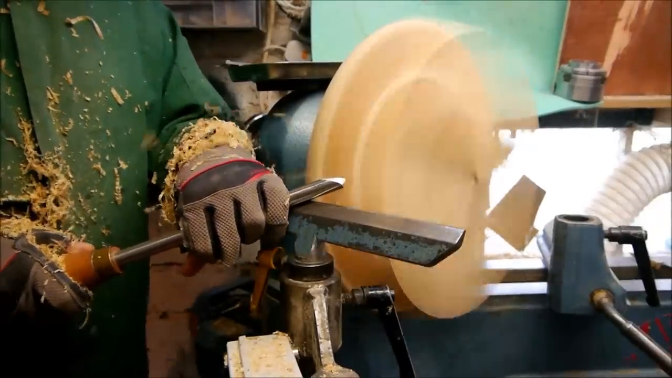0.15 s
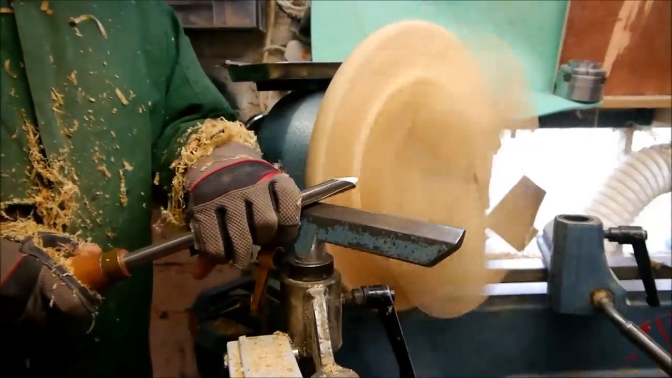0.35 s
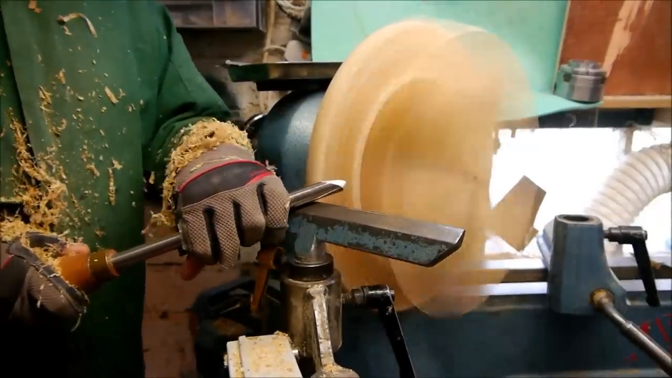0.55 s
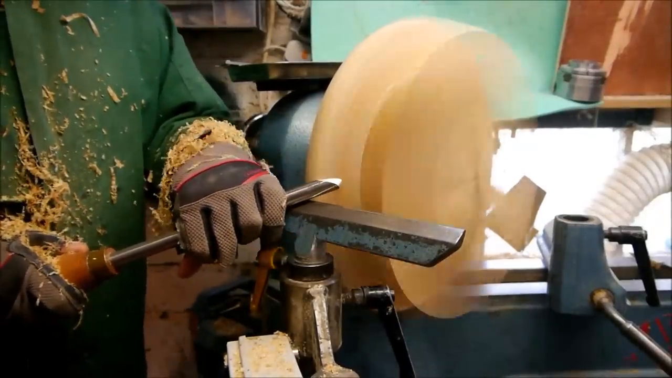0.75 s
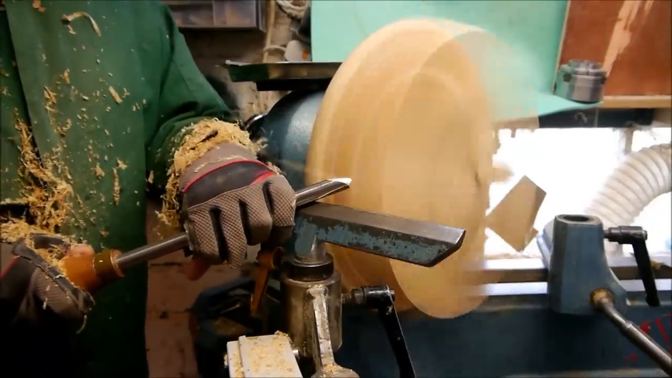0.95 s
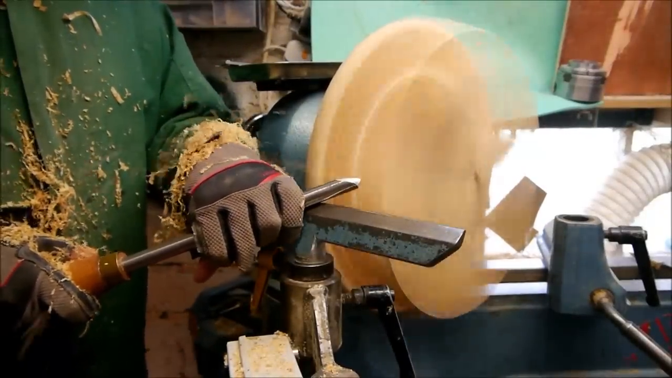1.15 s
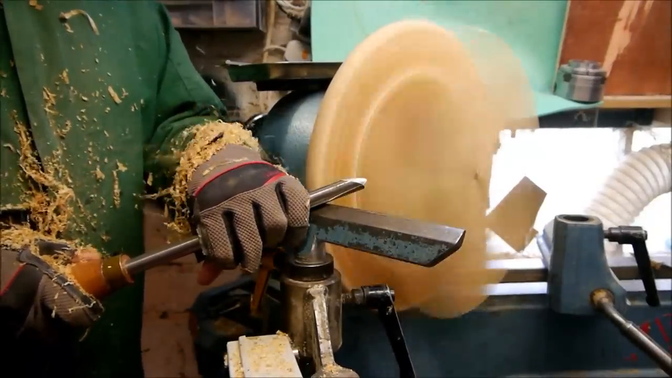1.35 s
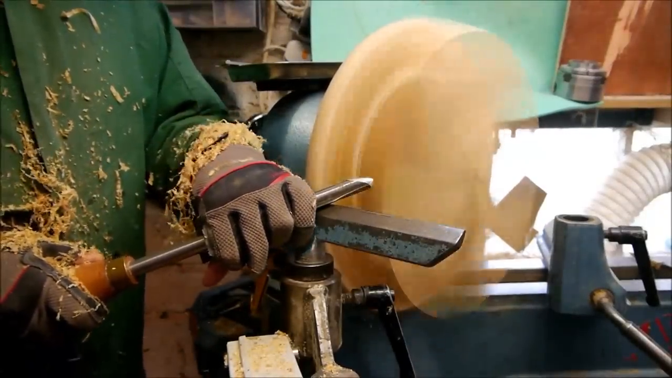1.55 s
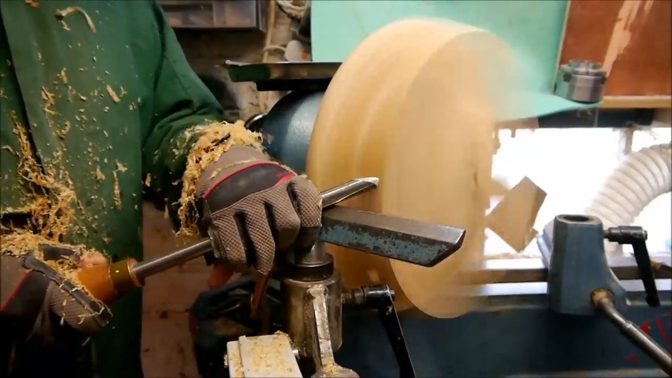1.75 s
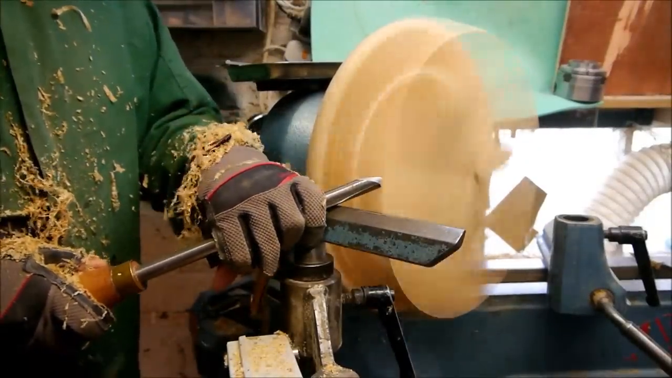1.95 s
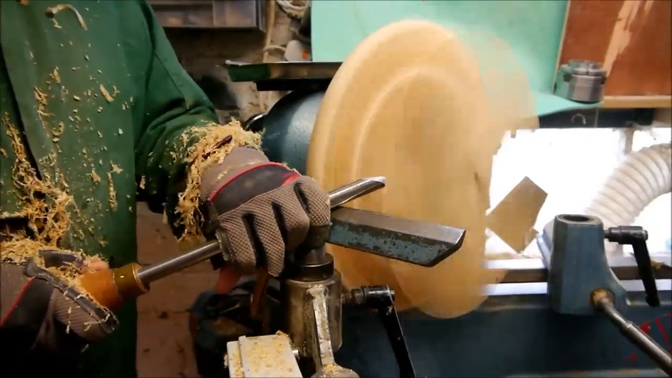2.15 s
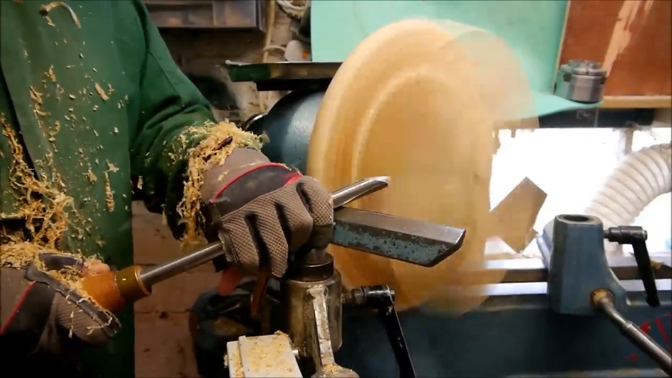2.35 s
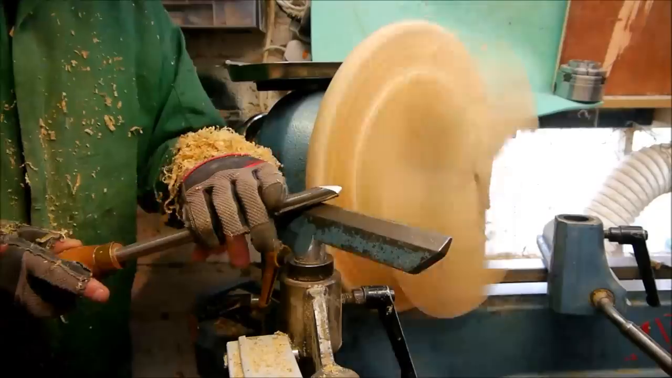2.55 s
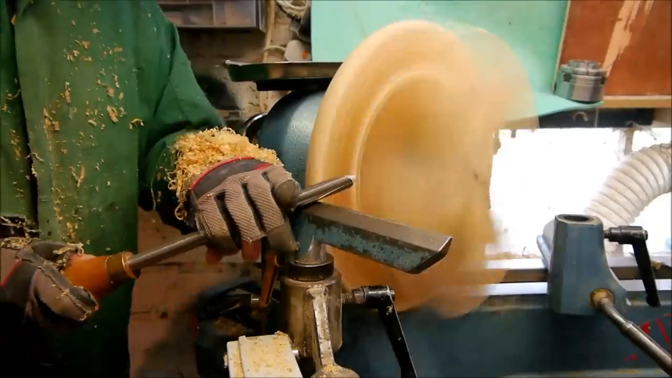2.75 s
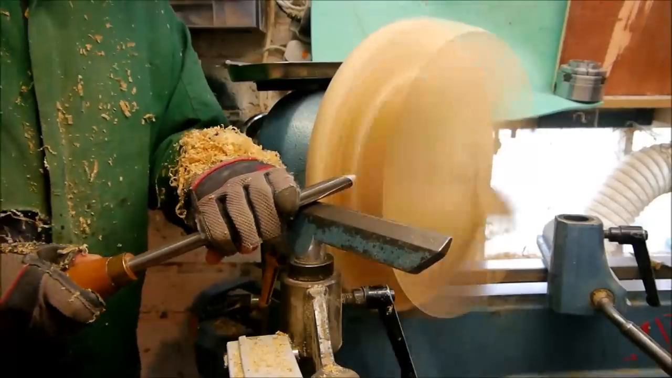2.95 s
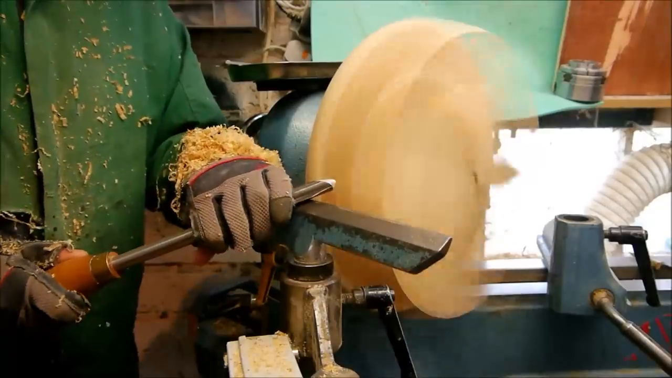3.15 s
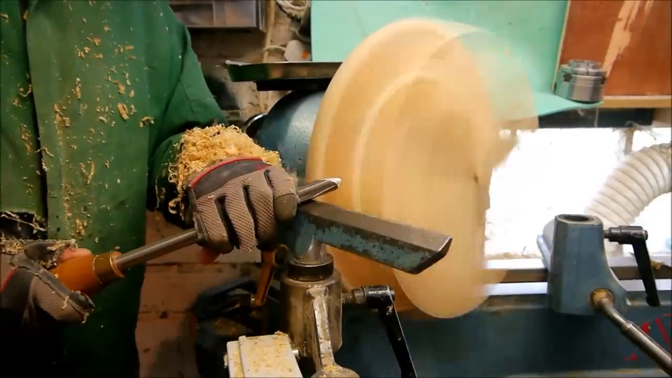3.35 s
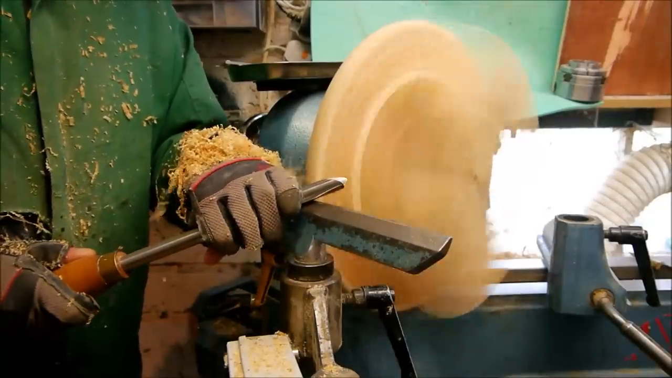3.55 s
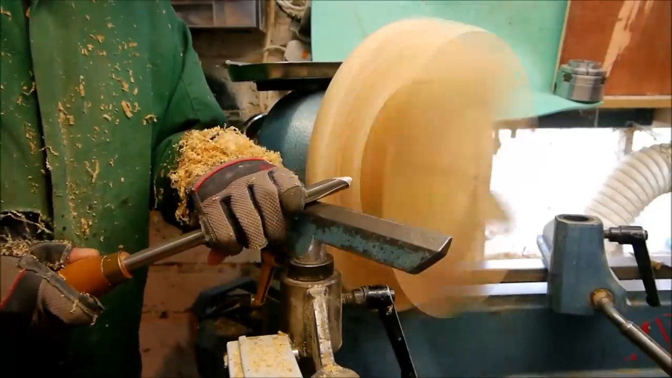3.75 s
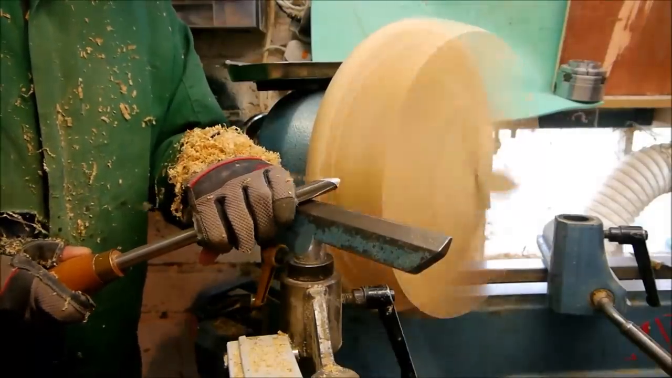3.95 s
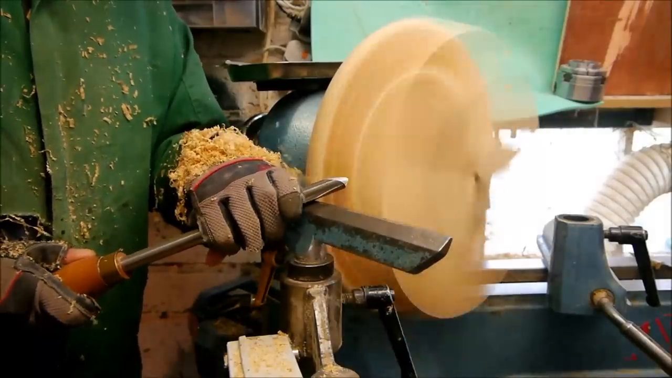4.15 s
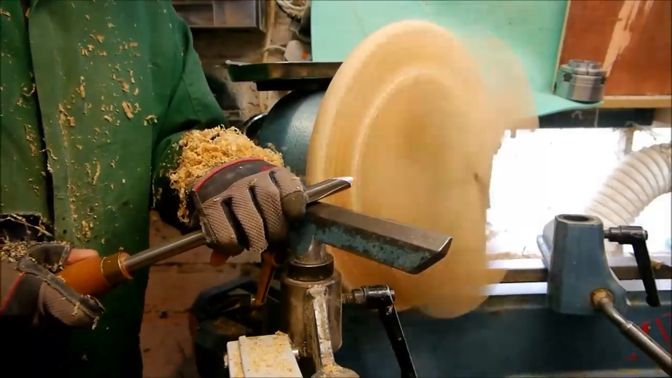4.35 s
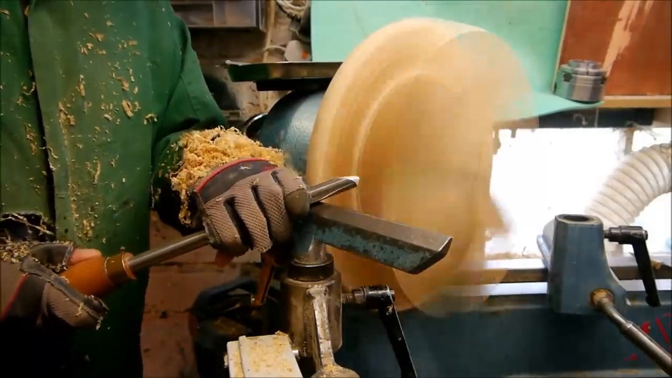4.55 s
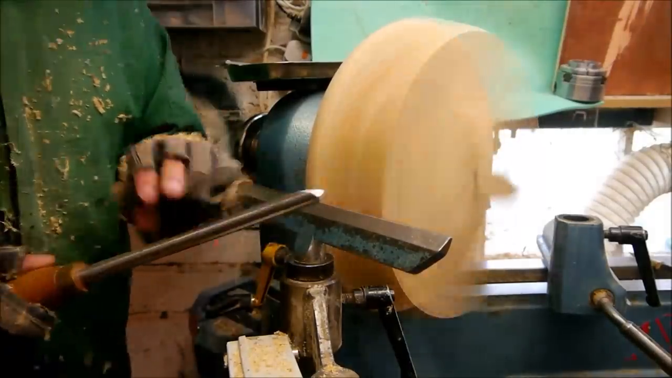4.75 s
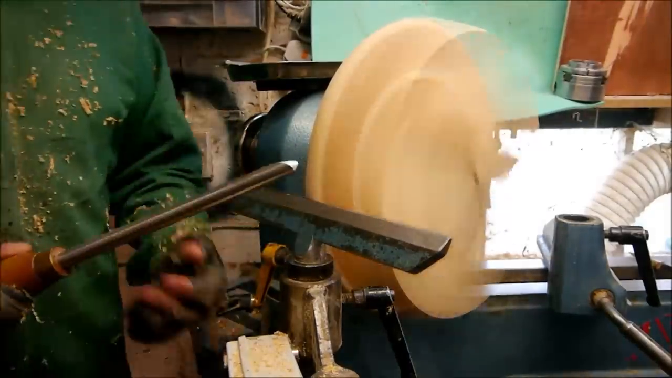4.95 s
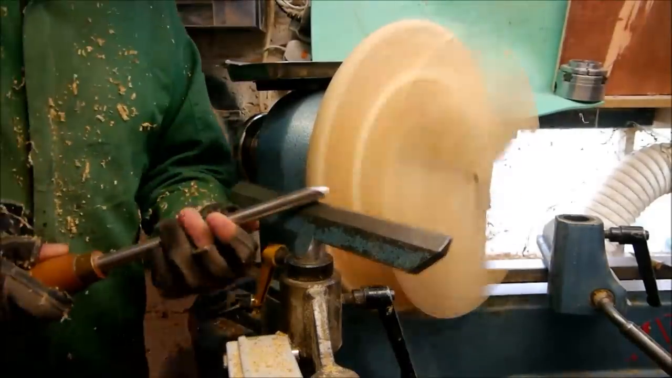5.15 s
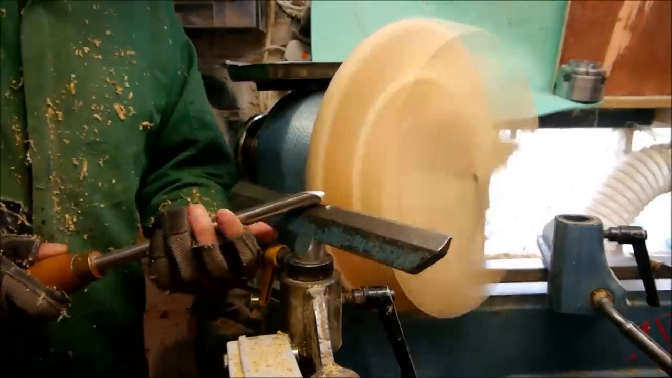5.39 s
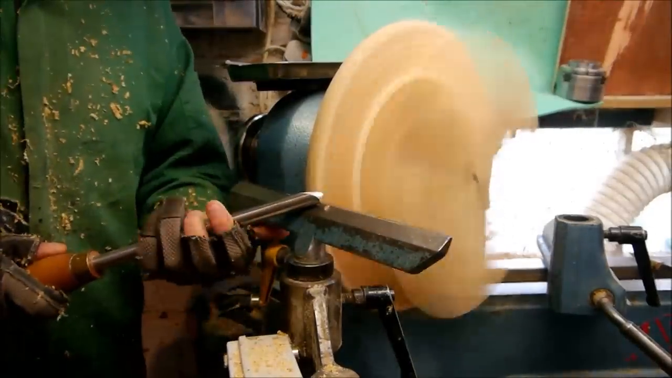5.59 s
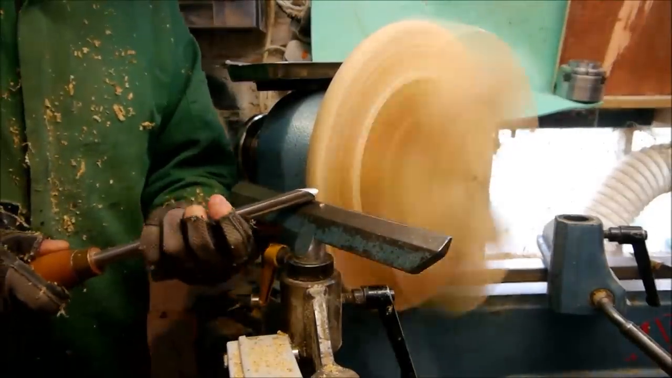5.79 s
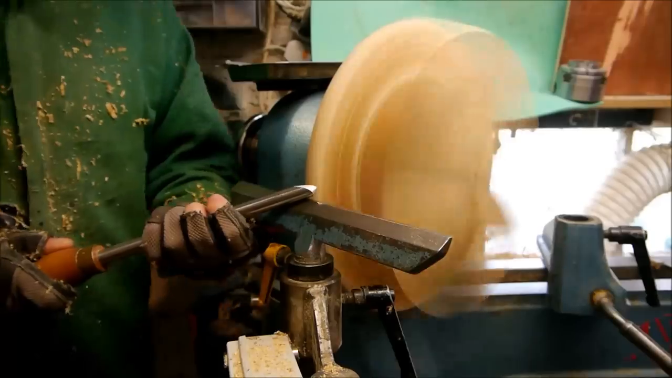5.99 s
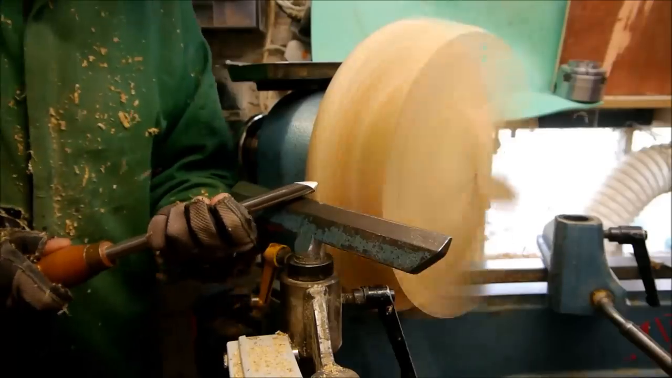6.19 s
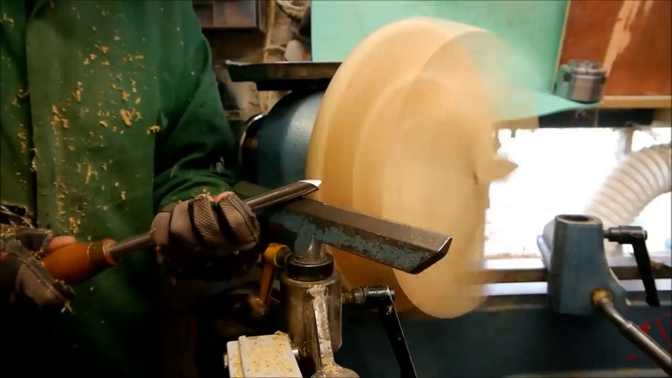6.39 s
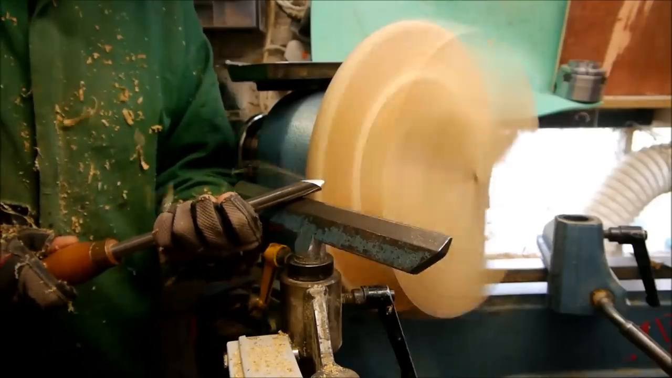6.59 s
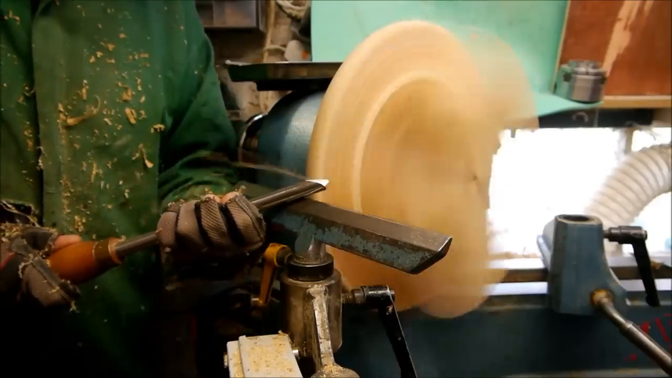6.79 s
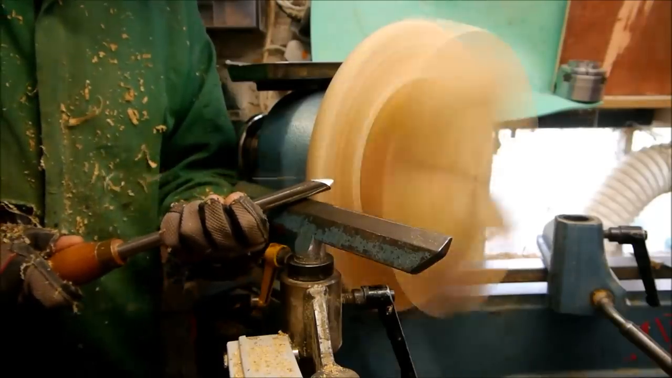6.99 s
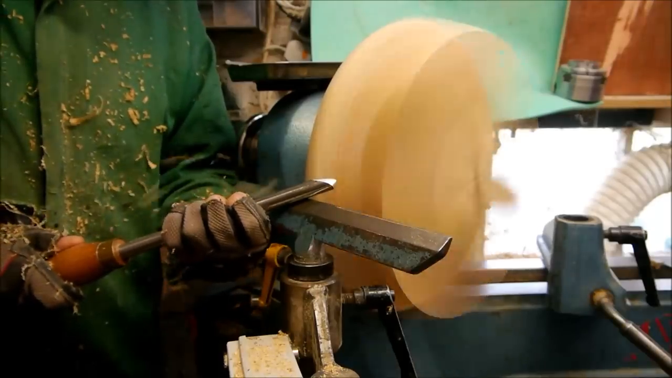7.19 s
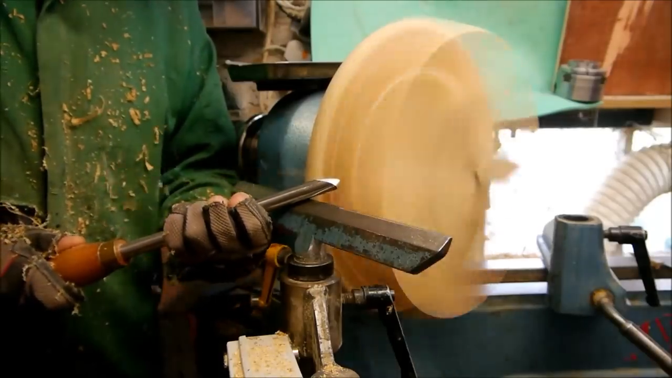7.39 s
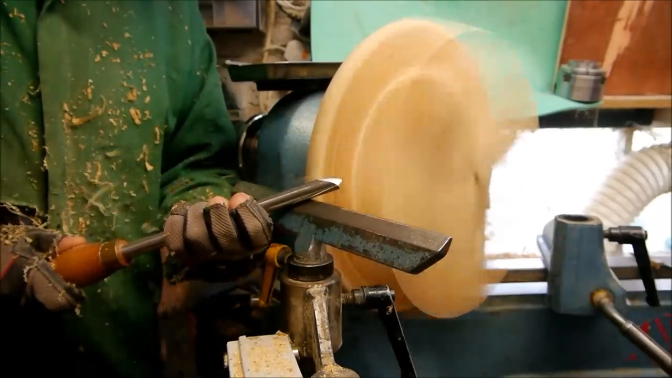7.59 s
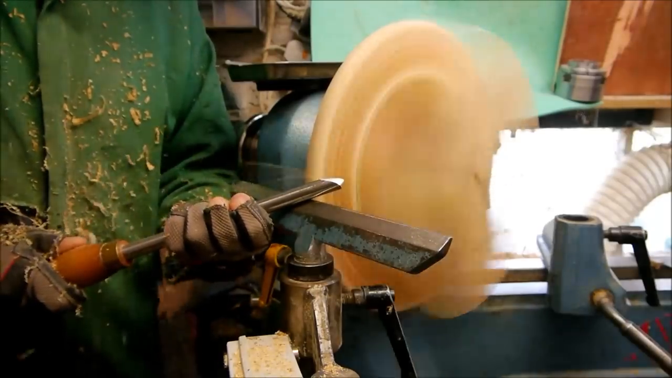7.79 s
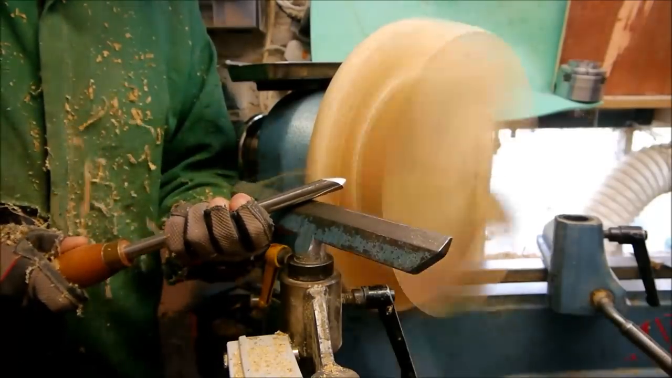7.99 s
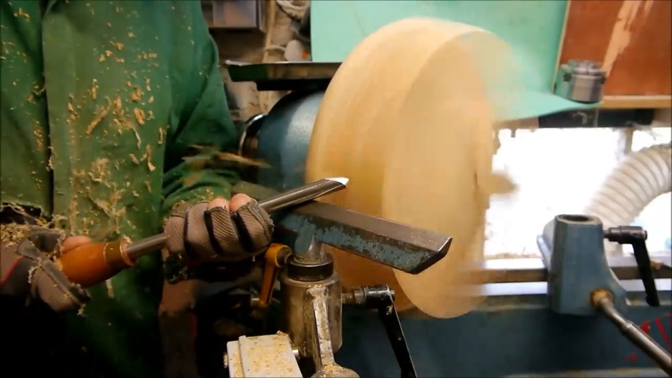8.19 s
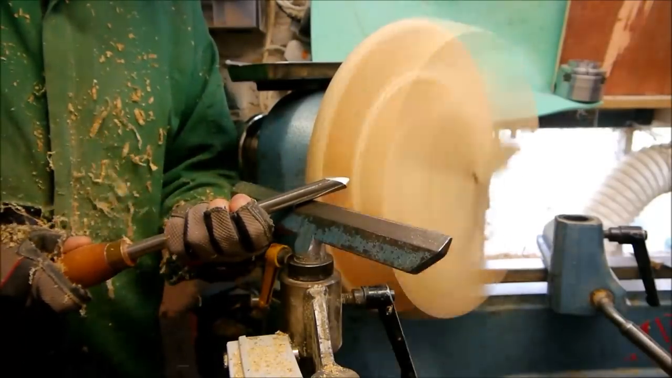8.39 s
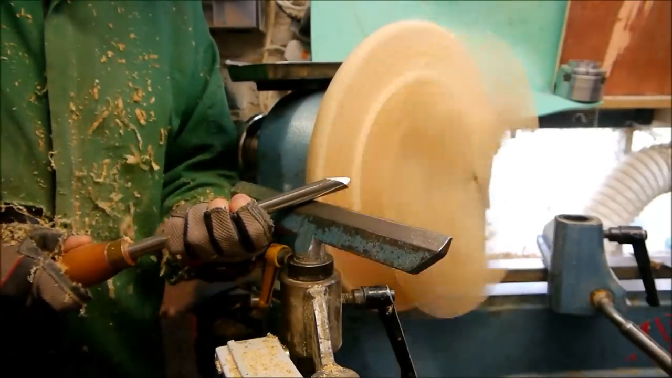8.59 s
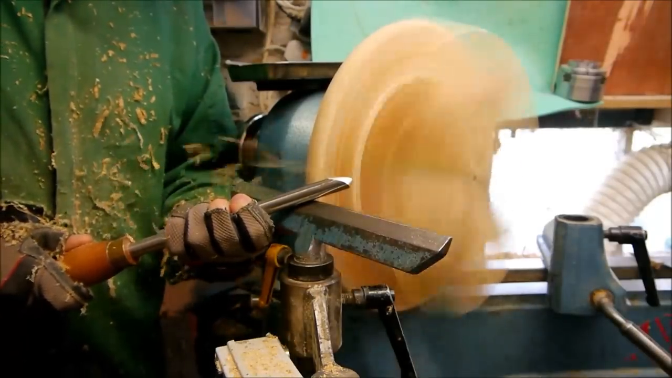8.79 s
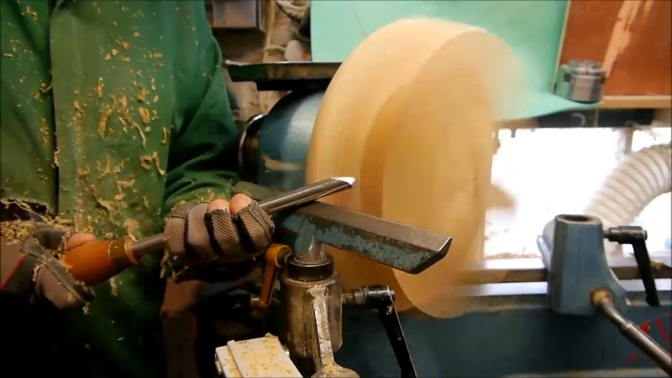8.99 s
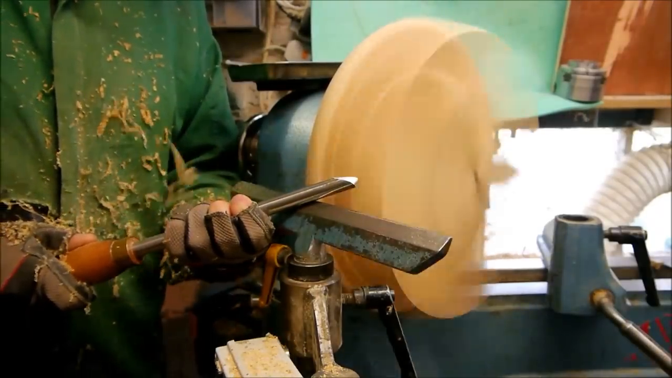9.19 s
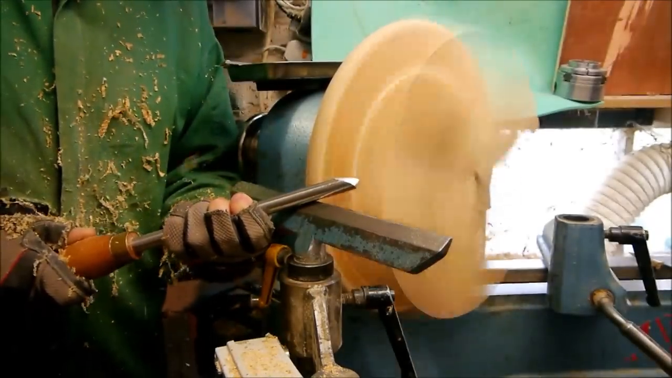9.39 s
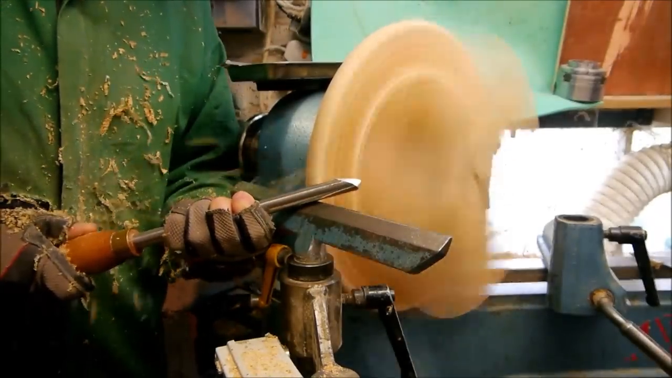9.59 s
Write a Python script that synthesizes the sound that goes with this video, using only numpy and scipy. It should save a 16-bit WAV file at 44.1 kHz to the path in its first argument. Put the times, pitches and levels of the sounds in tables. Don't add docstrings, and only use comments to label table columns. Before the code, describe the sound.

Close to a running lathe, a continuous whirr of air, extractor hose and low motor hum lies under bright metallic rasping. The cutting edge hits the turning wood in very fast regular pulses, making a gritty buzz with sharp catches and dull knocks. Five uneven cuts come first, then a gap with small tool clinks, then a sustained, thinner, sizzling scrape that wavers until the end.

```python
import sys
import numpy as np
from scipy import signal
from scipy.fft import rfft, irfft, next_fast_len
from scipy.io import wavfile
from scipy.ndimage import uniform_filter1d

SR = 44100
rng = np.random.default_rng(int(sys.argv[2]) if len(sys.argv) > 2 else 0)


def wav_out(sig):
    wavfile.write(sys.argv[1], SR, np.round(np.clip(np.atleast_2d(sig).T, -1, 1) * 32767).astype(np.int16))


def field_ratio(decibels):
    return 10 ** (np.asarray(decibels, dtype=float) / 20)


N = 425109

TURN = 795
SIZE = next_fast_len(N + 4096)
HZ = np.arange(SIZE // 2 + 1) * SR / SIZE + 1e-3


def rms_one(x):
    return x / np.sqrt(np.mean(x ** 2) + 1e-20)


def in_time(rows):
    s, *columns = np.transpose(rows)
    return [np.interp(np.arange(N) / SR, s, column) for column in columns]


def at_hz(points):
    hz, db = np.transpose(points)
    return np.interp(np.log(HZ), np.log(hz), db)


def drift(rate):
    knots_per_s = 200
    knots = rng.standard_normal(int(N / SR * knots_per_s) + 400)
    r = np.exp(-2 * np.pi * rate / knots_per_s)
    slow = rms_one(signal.lfilter([1], [1, -2 * r, r * r], knots)[398:])
    return np.interp(np.arange(N) / SR * knots_per_s, np.arange(len(slow)), slow)


def resonance(grid, hz, width):
    return 1j * grid * width / (hz ** 2 - grid ** 2 + 1j * grid * width)


def body(drive, modes, low_hz, high_hz, broad_db):
    size = next_fast_len(drive.shape[1] + 2048)
    grid = np.arange(size // 2 + 1) * SR / size
    ring = field_ratio(broad_db)
    for hz, width, db in modes:
        if .8 * low_hz < hz < 1.2 * high_hz:
            ring = ring + field_ratio(db) * resonance(grid, hz, width)
    band = signal.butter(4, [low_hz, high_hz], "band", fs=SR, output="sos")
    ring = ring * signal.sosfreqz(band, grid, fs=SR)[1]
    ring = ring / np.sqrt(np.mean(np.abs(ring) ** 2))
    return irfft(rfft(drive, size) * ring, size)[:, :drive.shape[1]]


def to_ports(mid_side, side_db, locked):
    mid, own = mid_side
    locked = np.clip(locked * (5000 / (HZ + 1000)) ** 0.9, 0, .95)
    side = field_ratio(side_db) * (np.sqrt(locked) * 1j * mid + np.sqrt(1 - locked) * own)
    return irfft(np.array([mid + side, mid - side]), SIZE)[:, :N]


def surface(kept):
    rows = rng.standard_normal((N // TURN + 1, 2, TURN))
    kept = np.clip(kept[::TURN], 0, .95)
    for k in range(1, len(rows)):
        rows[k] = kept[k] * rows[k - 1] + np.sqrt(1 - kept[k] ** 2) * rows[k]
    return rows.transpose(1, 0, 2).reshape(2, -1)[:, :N]


def strikes(rows, shift_db, decay_s):
    s, db = np.transpose(rows)
    clicks = np.zeros(N)
    clicks[(s * SR).astype(int)] = field_ratio(db + shift_db)
    return signal.lfilter([1], [1, -np.exp(-1 / (decay_s * SR))], clicks + 1e-18)


# (f/Hz, level/dB per Hz)
AIR_COLOUR = [(100, -35), (200, -47), (400, -27), (600, -15.5), (780, -7), (1300, -5.5), (1680, -7.5),
              (2300, -8), (3000, -11.5), (3600, -18), (5000, -18.5), (8200, -22), (13200, -15.5),
              (17000, -19)]
# (f/Hz, width/Hz, lift/dB)
AIR_HUMPS = [(1049, 35, 5.5), (1580, 120, 1.5), (1850, 156, 7.5), (2044, 147, 6), (2440, 115, 4),
             (3410, 140, 1.5), (6500, 2100, 7.5), (10720, 1650, 9)]
# (f/Hz, side-minus-mid level/dB)
AIR_SIDE = [(60, -34), (640, -32), (1410, -27), (2400, -17), (3100, -12.5), (3700, -6), (4400, -6),
            (8100, -4), (15000, -1.5)]
WHIRR_DB = -34.5


def whirr():
    humps_db = sum(db * np.abs(resonance(HZ, hz, width)) ** 2 for hz, width, db in AIR_HUMPS)
    colour = field_ratio(at_hz(AIR_COLOUR) + humps_db)
    flicker = field_ratio(.5 * drift(0.57) + 0.89 * drift(24.5))
    air = rfft(rng.standard_normal((2, N)) * flicker, SIZE) * colour
    noise = to_ports(air, at_hz(AIR_SIDE), locked=0.95)
    return field_ratio(WHIRR_DB) * rms_one(noise) * field_ratio([[-.2], [.2]])


# (multiple of the turning rate, level/dB)
HUM_ORDERS = [(4, -92.5), (6, -81.5), (8, -74.5), (10, -65.5), (18, -59.5), (25, -59), (26, -53.5),
              (27, -56.5), (39, -53.5), (44, -65.5), (46, -56.5), (59, -58.5), (60, -54)]
FAN_HZ, FAN_DB = 670, -55.5


def motor():
    turns = np.arange(N) / TURN
    tones = np.zeros(N)
    for order, db in HUM_ORDERS:
        phase = 2 * np.pi * order * turns + 1.2 * drift(4.0)
        tones += field_ratio(db + 2.5 * drift(6.0)) * np.sin(phase)
    fan_phase = 2 * np.pi * FAN_HZ * np.arange(N) / SR + 0.6 * drift(8.2)
    fan = field_ratio(FAN_DB + 2.8 * drift(19.0)) * np.sin(fan_phase)
    return np.sqrt(2) * (tones + fan)


# (t/s, peak level/dB, f/Hz, width/Hz)
PINGS = [(5.787, -40, 1500, 500), (5.793, -30, 3760, 50), (6.031, -33, 7000, 300), (6.037, -24, 7600, 150),
         (6.043, -28, 6540, 200), (6.2405, -20, 4570, 500), (6.2405, -9, 10100, 600),
         (6.242, -22, 2500, 300)]
PING_RISE_S = 0.00056


def pings():
    out = np.zeros(N)
    t = np.arange(2000) / SR
    for s, db, hz, width in PINGS:
        envelope = np.exp(-np.pi * width * t) * (1 - np.exp(-t / PING_RISE_S))
        start = int(s * SR)
        out[start:start + len(t)] += field_ratio(db) * np.sin(2 * np.pi * hz * t) * envelope
    return out


# (t/s, pressure as scrape level/dB, flute roll as brightness/dB)
ROUGHING = [
    [(0.11, -56, -2), (0.116, -37.5, -2), (0.25, -33.5, 2), (0.30, -42.5, 2.5), (0.40, -32.5, 2),
     (0.432, -39, 0), (0.482, -33, -1), (0.555, -36, -2), (0.572, -47, 3)],
    [(0.83, -56, 0), (0.838, -35, -3), (0.91, -37, 0), (1.27, -29, -1.5), (1.614, -33.5, -1),
     (1.882, -33, -1), (2.482, -35.5, -1), (2.53, -55, 3)],
    [(2.86, -41.5, 0), (2.948, -42.5, 4), (2.962, -23, -7), (3.022, -56, 16), (3.086, -32.5, -3),
     (3.112, -43, 12), (3.126, -72, 6)],
    [(3.28, -51, 4), (3.296, -32, -2), (3.315, -45, 2), (3.343, -54, 2), (3.35, -43, 6), (3.418, -30.5, 4),
     (3.795, -35, 6.5), (3.812, -51, 4)],
    [(4.012, -55, 4), (4.022, -36.5, 6.5), (4.15, -31.5, 4.5), (4.422, -37, 5.5), (4.54, -32.5, 2.5),
     (4.63, -31.5, -4), (4.678, -32, 0), (4.70, -32, -2), (4.72, -60, -2)],
]
# (t/s, pressure as scrape level/dB, flute roll as brightness/dB)
FINISHING = [
    [(6.41, -62, -3), (6.436, -36, -7), (6.486, -76, -3), (6.492, -44, 8.5), (6.664, -36.5, 1.5),
     (7.214, -38.5, 7), (7.44, -34, 6), (7.452, -55, 3), (7.465, -40, 9)],
    [(7.475, -33, 8), (7.491, -56, 6), (7.505, -32.5, 4), (7.539, -42, 7), (7.619, -33.5, 3.5),
     (8.007, -34.5, 7), (8.323, -33, 4), (8.657, -34.5, 4.5), (8.685, -46, 6)],
    [(8.695, -44, 5.5), (8.797, -34.5, 3.5), (9.225, -34, 2), (9.393, -37, -2), (9.417, -52, 1),
     (9.453, -40, 8), (9.473, -68, 8), (9.485, -37, 0), (9.64, -36, 3)],
]
# (bright edge level/dB, top hiss level/dB, blank knock level/dB)
TOOL_SETS = [(-4.5, 0, -39), (-1, -1.5, -41.5), (-5, 0.5, -35.5), (-5, -3.5, -36.5), (-4.5, -3, -38),
             (-4, -5, -38.5), (-1, -3.5, -36), (-1, -0.5, -37)]
# (t/s, peak level/dB)
CATCHES = [(0.1227, -12), (0.484, -6.5), (0.5215, -10), (0.838, -18), (0.8819, -14.5), (1.3673, -10),
           (1.927, -19), (2.9614, -24), (3.1035, -17), (3.355, -18), (4.0233, -17), (4.6184, -15),
           (6.24, -16.5), (6.495, -13.5), (6.557, -17), (7.4126, -36), (7.4954, -24), (7.7196, -9.5),
           (7.9897, -25), (8.7206, -18), (8.775, -26), (8.8477, -16), (9.1022, -11), (9.4504, -21),
           (9.4866, -13), (9.5582, -20)]
# (t/s, peak level/dB)
KNOCKS = [(0.3614, -23.5), (1.063, -24.5), (1.1367, -30), (1.8312, -35), (2.337, -45), (2.4089, -37),
          (2.442, -29), (2.7934, -46), (2.9603, -27), (2.9692, -18.5), (2.988, -19.5), (3.0353, -21.5),
          (3.0702, -28), (3.0775, -18.5), (3.097, -28), (3.492, -25), (3.6663, -36), (4.477, -23.5),
          (4.583, -31), (4.6187, -24), (6.5013, -17), (6.5915, -18.5), (6.838, -22.5), (6.984, -33),
          (7.411, -24), (7.7197, -22.5), (8.0001, -26.5), (8.269, -37), (8.585, -19.5), (8.9365, -18.5),
          (9.108, -25.5), (9.208, -22)]
SCRAPE_GAIN_DB, MEAN_PRESSURE_DB = 0.5, -32.5
KNOCK_FOLLOWS = 0.64
EDGE_ROLL, HISS_ROLL = 0.39, 1.29
TREMOR_DB, TREMOR_PER_S = 0.6, 18.
SURGE_DB, SURGE_S = -23, 0.013
DIG_LEAD_S, DIG_RISE_S, DIG_FALL_S = .009, .004, .022
DIG_KNOCK_DB, DIG_SCRAPE_DB = -13.5, -14.5


def hand():
    rows = []
    for moves, tool_set in zip(ROUGHING + FINISHING, TOOL_SETS):
        rows.append((moves[0][0] - .004, -80, 0, *tool_set))
        rows.extend((*move, *tool_set) for move in moves)
        rows.append((moves[-1][0] + .004, -80, 0, *tool_set))
    pressure_db, roll_db, edge_db, hiss_db, knock_db = in_time(rows)
    early = np.array(KNOCKS) - [DIG_LEAD_S, 0]
    r = np.exp(-1 / (DIG_RISE_S * SR))
    dig = signal.lfilter([1 - r], [1, -r], strikes(early, 0, DIG_FALL_S))
    surge = strikes(CATCHES, SURGE_DB, SURGE_S) * (pressure_db > -60)
    steady = field_ratio(pressure_db + SCRAPE_GAIN_DB + TREMOR_DB * drift(TREMOR_PER_S))
    steady = np.hypot(steady, surge)
    scrape = np.hypot(steady, field_ratio(DIG_SCRAPE_DB) * dig)
    edge = steady * field_ratio(edge_db + EDGE_ROLL * roll_db)
    hiss = steady * field_ratio(hiss_db + HISS_ROLL * roll_db)
    knock = field_ratio(knock_db + KNOCK_FOLLOWS * (pressure_db - MEAN_PRESSURE_DB))
    return [scrape, edge, hiss], np.hypot(knock, field_ratio(DIG_KNOCK_DB) * dig)


# (t/s, peak level/dB)
BITES = [(0.1238, -11), (0.1517, -20), (0.3228, -14), (0.4421, -15), (0.467, -10.5), (0.484, -11),
         (0.5209, -13), (0.8372, -16), (0.8821, -14), (0.9544, -12), (0.9908, -10), (1.0621, -11),
         (1.0981, -9.5), (1.1435, -5.5), (1.1709, -9), (1.2153, -6), (1.2522, -4.5), (1.3146, -11),
         (1.3315, -6.5), (1.3674, -9), (1.4044, -10), (1.4767, -8), (1.5585, -11), (1.6748, -15),
         (1.6932, -8.5), (1.7476, -13), (1.7835, -13), (1.854, -10.5), (1.8728, -10.5),
         (1.8913, -9.5), (1.9272, -12), (1.9631, -10), (2.0454, -11.5), (2.0808, -6), (2.3048, -15),
         (2.3881, -11), (2.9596, -8.5), (3.0776, -10.5), (3.1045, -17), (3.3569, -12), (3.3759, -21),
         (3.3928, -13), (3.4113, -10.5), (3.565, -11), (3.7266, -13), (3.763, -17), (4.0227, -13.5),
         (4.0509, -14), (4.0778, -13), (4.2225, -13), (4.2674, -15), (4.3033, -13), (4.3392, -17),
         (4.383, -13.5), (4.4654, -15.5), (4.5804, -7.5), (4.6176, -7.5), (4.688, -18),
         (6.4943, -18), (6.5572, -19), (6.5926, -10), (6.9443, -14), (6.9627, -14), (6.9982, -15.5),
              (7.0356, -15.5), (7.288, -14.5), (7.4127, -13), (7.4327, -12), (7.4955, -19), (7.5314, -17),
              (7.5579, -16.5), (7.5758, -16), (7.6038, -13.5), (7.6397, -13), (7.6836, -18), (7.7195, -16),
              (7.7834, -17), (7.8193, -17), (7.8552, -15), (7.8816, -13.5), (7.955, -16), (7.9894, -15),
              (8.0089, -15), (8.0543, -22), (8.0975, -15.5), (8.162, -18), (8.1979, -14), (8.2698, -13),
              (8.2972, -13), (8.3601, -11), (8.378, -15), (8.4319, -16), (8.4858, -18), (8.5042, -16),
              (8.5401, -18), (8.5834, -13), (8.6125, -11), (8.6489, -13), (8.694, -18), (8.7207, -14),
              (8.7387, -11), (8.7746, -15.5), (8.811, -16), (8.847, -11.5), (8.9008, -9.5), (8.9557, -14),
              (9.064, -15), (9.1066, -13), (9.1263, -10.5), (9.2054, -9.5), (9.2341, -11), (9.3064, -14.5),
              (9.4321, -19), (9.4501, -18.5), (9.4865, -19), (9.5583, -19)]
BITE_CREST_DB = 17.5
ENTRY_MS, EXIT_MS, CLEAR_MS = -2.3, 0.81, 0.23
SWELL_DB, CLEAR_DB, TRAIL_DB_PER_MS = 9., 1., -1.9


def contacts(peak_ms, scrape):
    half_ms = 500 * TURN / SR
    since_ms = np.arange(N) * 1000 / SR - peak_ms - ENTRY_MS + 2 * half_ms
    count, ms = np.divmod(since_ms, half_ms)
    count = count.astype(int)
    luck = rng.standard_normal((count.max() + 1, 6))[count].T
    length = EXIT_MS - ENTRY_MS
    shape_db = np.interp(ms, [0, length, length + CLEAR_MS], [0, SWELL_DB, CLEAR_DB])
    shape_db = shape_db + TRAIL_DB_PER_MS * np.maximum(ms - length, 0)
    shape_db = shape_db + .8 * luck[0] + 1.1 * luck[1] * (ms + ENTRY_MS < -.5)
    s, peak_db = np.transpose(BITES)
    at = ((s + .001) * SR).astype(int)
    extra_db = np.zeros(count.max() + 1)
    extra_db[count[at]] = np.clip(peak_db - BITE_CREST_DB - 20 * np.log10(scrape[at]), -3, 6.5)
    bite = field_ratio(extra_db[count])
    return rms_one(field_ratio(shape_db)) * bite, bite, luck


def fibre_snaps(peak_ms):
    marks = np.arange(1, 2 * N // TURN - 2)
    luck = rng.standard_normal((len(marks), 4)).T
    centre = marks * TURN / 2 + (peak_ms[marks * TURN // 2] + .21 * (marks % 2)) * SR / 1000
    snaps = np.zeros(N)
    for k, (early_ms, jitter_ms, db) in enumerate([(1.3, 0.12, -19.0), (.2, 0.058, -2.0)]):
        at = np.round(centre + (jitter_ms * luck[k] - early_ms) * SR / 1000).astype(int)
        snaps[at] = field_ratio(db + 1.1 * luck[k + 2]) * (-1) ** k
    return rms_one(snaps)


# (f/Hz, width/Hz, level/dB)
BLANK_MODES = [(1108, 16, -3), (1235, 44, 1), (1377, 170, -7.5), (1539, 37, -7), (1850, 24, -2.5),
               (2137, 66, -5), (2340, 135, -7), (2506, 64, -4.5)]
# (f/Hz, width/Hz, level/dB)
JOLT_MODES = [(1213, 37, 5), (2460, 110, -9)]
JOLT_DB = 9.5


def blank(burst, knock, kept, luck):
    thud = np.hypot(knock * field_ratio(1.2 * luck) * burst, strikes(KNOCKS, -12, 0.005))
    thud = signal.lfilter([.02], [1, -.98], thud)
    rub = body(surface(kept * 0.82) * thud, BLANK_MODES, 1140, 4200, broad_db=-25.0)
    blows = strikes(KNOCKS, JOLT_DB, 0.00006) * [[1], [0]]
    jolts = body(blows, BLANK_MODES + JOLT_MODES, 1030, 2900, broad_db=-17.0)
    shudder = body(rng.standard_normal((2, N)) * thud, [(428, 59, 0)], 200, 680, broad_db=-30)
    return rub + jolts + shudder * field_ratio(-29.5)


BAND_EDGES = [4400, 8300, 12000, 18500]
# (from t/s, to t/s, [(f/Hz, width/Hz, level/dB)])
STEEL_OVERHAND = [(0, 0.7, [(4870, 430, -10), (6500, 150, -15), (6860, 290, 3), (7480, 150, -17),
                  (8560, 300, -18), (10000, 400, 4), (10900, 300, -2), (11900, 300, -8), (13700, 540, -4),
                  (14800, 400, -15)]), (0.7, 1.2, [(5140, 380, -8), (6500, 150, -9), (6870, 260, 4.5),
                  (7400, 120, -9), (10100, 350, 1), (10900, 300, -3), (11900, 300, -8), (13300, 400, 6),
                  (14400, 500, 4)]), (1.2, 1.85, [(5200, 220, -12), (6430, 150, -8), (6890, 220, 4.5),
                  (7440, 180, -5), (10100, 280, 7), (11200, 270, 0), (13150, 460, -2), (14300, 600, 0)]),
                  (1.85, 2.7, [(4260, 570, 6), (6370, 230, 7), (6750, 260, 8), (8600, 300, -2),
                  (9200, 610, -2), (10240, 540, 9), (10900, 300, -5), (13300, 900, -6), (15200, 460, -17)]),
                  (2.7, 4.422, [(4750, 410, 0), (5220, 350, -10), (6460, 290, 0.5), (7010, 230, -1.5),
                  (8350, 350, -3), (9360, 300, 1), (10100, 280, 8), (11100, 690, -1), (13840, 500, 4),
                  (14900, 700, -7)]), (4.421, 5.5, [(4750, 300, -13), (5840, 250, -9), (6600, 240, -6),
                  (7000, 270, -6), (7800, 300, -11), (10100, 400, -3), (11300, 690, -12), (13800, 800, 2)])]
# (from t/s, to t/s, [(f/Hz, width/Hz, level/dB)])
STEEL_UNDERHAND = [(5.5, 6.87, [(4750, 280, -2), (5230, 320, 2), (6380, 150, 3), (6830, 180, 2),
                   (8410, 200, -4), (9750, 500, 4), (10900, 300, -1), (13300, 500, -3), (15300, 400, -4)]),
                   (6.86, 7.43, [(4800, 200, 2), (5260, 300, 3), (6380, 200, -3), (6820, 210, -1),
                   (8500, 200, -1), (9900, 620, 9), (10500, 300, -4), (12000, 300, 0), (14000, 600, -1),
                   (15100, 400, -1)]), (7.45, 8.23, [(4700, 110, 1), (5080, 350, 0.5), (6420, 140, 4.5),
                   (6870, 84, 7), (8300, 210, -4), (10100, 410, 0), (12100, 250, 3), (13500, 300, 3),
                   (13900, 450, 4), (15100, 300, -4)]), (8.23, 8.67, [(4730, 98, 5), (5150, 400, -4),
                   (5850, 300, -12), (6450, 88, -2), (6700, 120, -15), (8370, 150, -1), (10100, 300, 7),
                   (11140, 300, 0), (12100, 250, 0), (12400, 180, 5), (13800, 270, 5), (15100, 230, -5)]),
                   (8.69, 9.08, [(4680, 96, -3), (5100, 400, -16), (6430, 97, -5), (6860, 130, -1),
                   (8300, 70, 2), (10150, 400, 4), (12000, 200, 5), (12520, 150, 5), (13900, 280, 3),
                   (14900, 400, -13)]), (9.08, 9.69, [(4940, 300, -11), (6470, 92, 0), (6900, 180, 1),
                   (8400, 200, -13), (9990, 280, 1), (11900, 220, 0), (12300, 150, 0), (13900, 250, 7)])]
# (scrape, edge, hiss [share of pitch per s])
SLIDES = [(0, 0, 0.001), (-0.015, .003, -.005), (-.02, -0.0016, -.005), (-0.012, 0.019, -.01),
          (0.004, -0.0013, -0.011), (0.016, 0.018, -.003), (-0.021, 0.012, 0.006), (0.0095, .003, 0.006),
          (0.00086, 0.00056, -.01), (-0.01, -.003, -0.0081), (0.0078, 0.0023, -0.0068),
          (-0.0032, -.003, -.003)]
MODE_WANDER_DB = 0.6
STEP = 5000


def steel(drive, band):
    out = np.zeros((2, N + 4 * STEP))
    fade = np.hanning(2 * STEP + 1)[:-1]
    drive = np.pad(drive, [(0, 0), (STEP, 2 * STEP)])
    low_hz, high_hz = BAND_EDGES[band:band + 2]
    for (start, end, modes), slide in zip(STEEL_OVERHAND + STEEL_UNDERHAND, SLIDES):
        first = int(np.ceil(start * SR / STEP))
        last = int(np.ceil(end * SR / STEP)) + (end * SR + 1 > N)
        for k in range(first, last):
            shift = 1 + slide[band] * (k * STEP / SR - (start + end) / 2)
            now = [(hz * shift, width, db + MODE_WANDER_DB * rng.standard_normal())
                   for hz, width, db in modes]
            part = drive[:, k * STEP:(k + 2) * STEP] * fade
            part = np.pad(part, [(0, 0), (0, 1024)])
            out[:, k * STEP:k * STEP + part.shape[1]] += body(part, now, low_hz, high_hz, broad_db=-6.0)
    return out[:, STEP:STEP + N]


# (t/s, end-grain peak after the turn mark/ms, surface kept per turn [0-1], L-R level/dB)
CUT_COURSE = [(0, 0.3, 0.55, 1.8), (1.0, 0.33, 0.66, 1.3), (2.6, 0.35, 0.8, 1.3), (2.7, 5.3, 0.1, 0.8),
              (3.4, 5.5, 0.74, 1.4), (3.9, 5.5, 0.74, 1.4), (4.0, 4.9, 0.68, 1.4), (4.7, 4.7, 0.35, 1.3),
              (5.5, 5.4, 0.15, 1), (7.0, 5.6, 0.7, 0.3), (7.4, 5.9, 0.7, 0.8), (8.0, 5.7, 0.6, 0.7),
              (9.1, 5.3, 0.41, 1.2), (9.64, 5.6, 0.3, 1.6)]
# (t/s, peak level/dB)
TICKS = [(5.189, -16), (5.212, -14), (5.4394, -32), (6.1194, -27)]
# (f/Hz, side-minus-mid level/dB)
CUT_SIDE = [(60, -40), (640, -32), (1410, -27), (2600, -16), (3200, -10), (3700, -3), (4500, -4),
            (6820, -2), (15000, -1)]


def gouge():
    peak_ms, kept, pan_db = in_time(CUT_COURSE)
    levels, knock = hand()
    burst, bite, luck = contacts(peak_ms, levels[0])
    snap = strikes(CATCHES, -16, 0.0061) + strikes(TICKS, -16, 0.003)
    fibres = fibre_snaps(peak_ms)
    out = np.zeros((2, N))
    memory, snap_db = [1.05, .75, .6], [0., -1., -1.]
    for band, level in enumerate(levels):
        own_db = (.3 + .8 * band) * luck[2 + band]
        envelope = np.hypot(level * field_ratio(-3.0 + own_db) * burst, field_ratio(snap_db[band]) * snap)
        drive = surface(kept * memory[band]) * envelope
        drive[0] += level * field_ratio(-11.5 - .7 * band) * fibres * bite
        out += steel(drive, band)
    high = signal.butter(3, 3800, "high", fs=SR, output="sos")
    lean = 0.12 * pan_db * signal.sosfiltfilt(high, out[0]) * [[1], [-1]]
    out += blank(burst, knock, kept, luck[5])
    return to_ports(rfft(out, SIZE), at_hz(CUT_SIDE), locked=0.55) + lean


def scene():
    return whirr() + motor() + pings() + gouge()


def low_pass(x):
    return signal.sosfilt(signal.butter(12, 16510, fs=SR, output="sos"), x)


def record(dry):
    level_db = 10 * np.log10(uniform_filter1d(np.mean(dry ** 2, axis=0), size=128) + 1e-12)
    fall = 60. * np.arange(N) / SR
    held_db = np.maximum.accumulate(np.maximum(level_db + 17.0, 0) + fall) - fall
    duck_db = signal.lfilter([.004], [1, -.996], -.25 * held_db)
    rounded = 1.3 * np.tanh(dry * field_ratio(duck_db + .6) / 1.3)
    low_cut = signal.butter(6, 165, "high", fs=SR, output="sos")
    top_cut = signal.ellip(14, .5, 65, 15830, fs=SR, output="sos")
    mix = signal.sosfilt(top_cut, signal.sosfilt(low_cut, rounded))
    return low_pass(mix)


dry = scene()
out = record(dry)
wav_out(out)
```